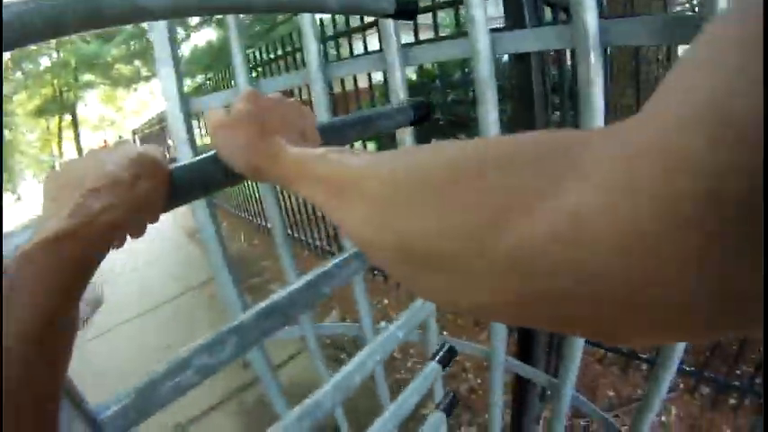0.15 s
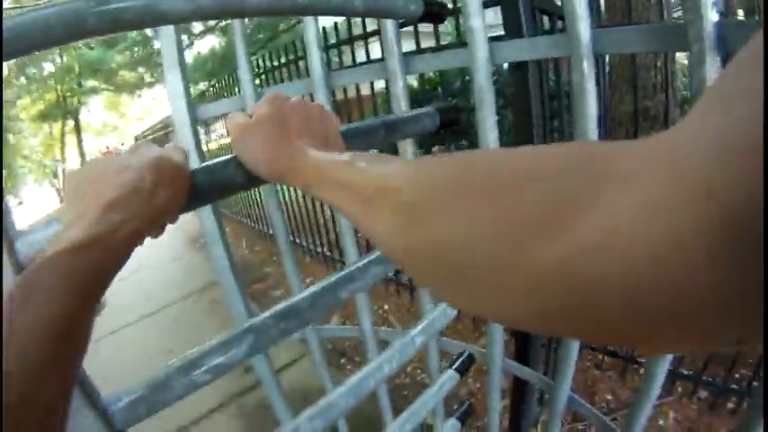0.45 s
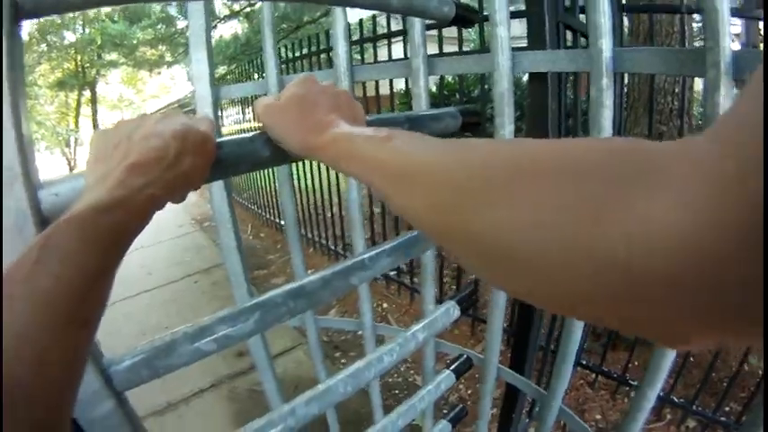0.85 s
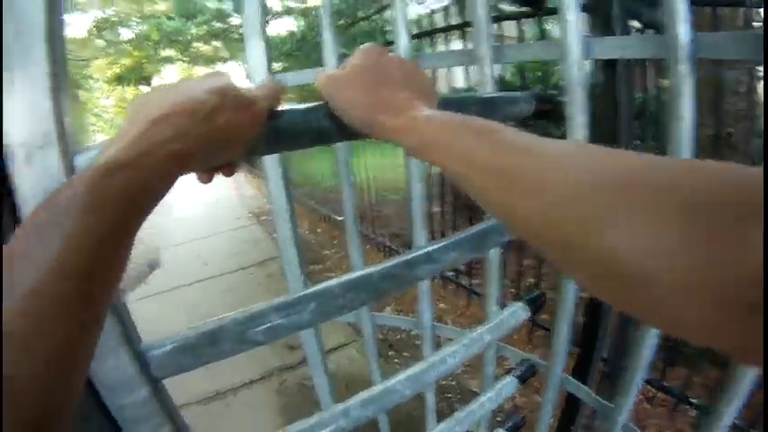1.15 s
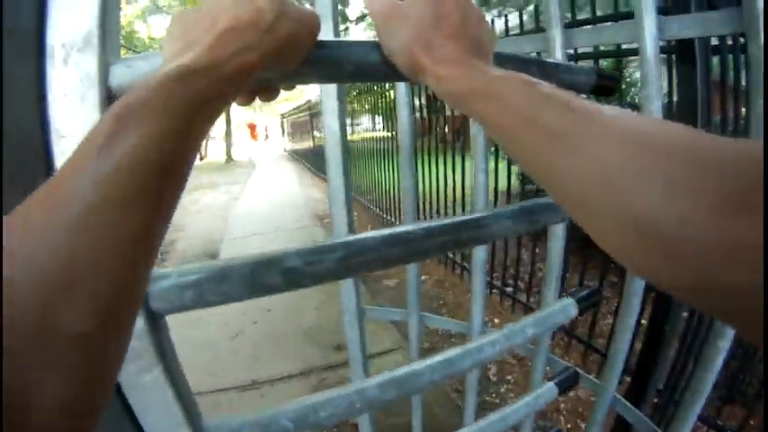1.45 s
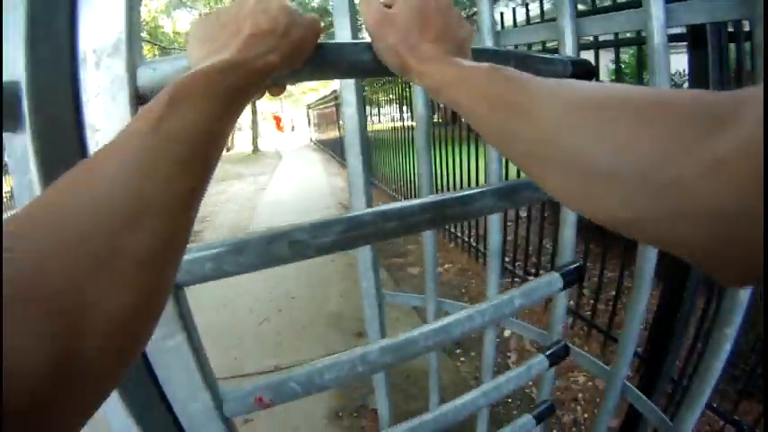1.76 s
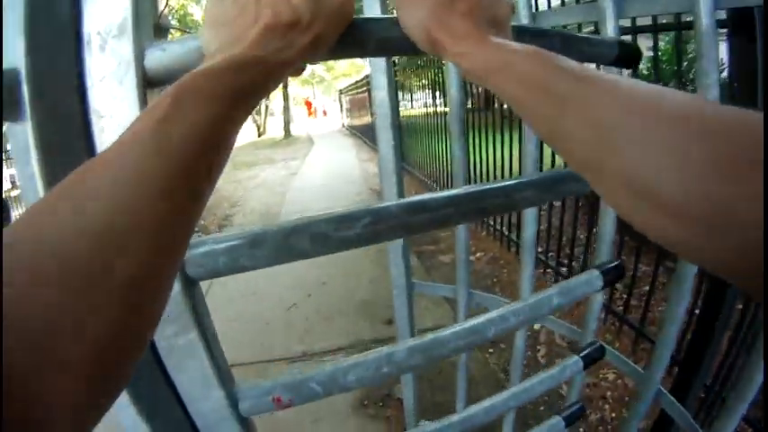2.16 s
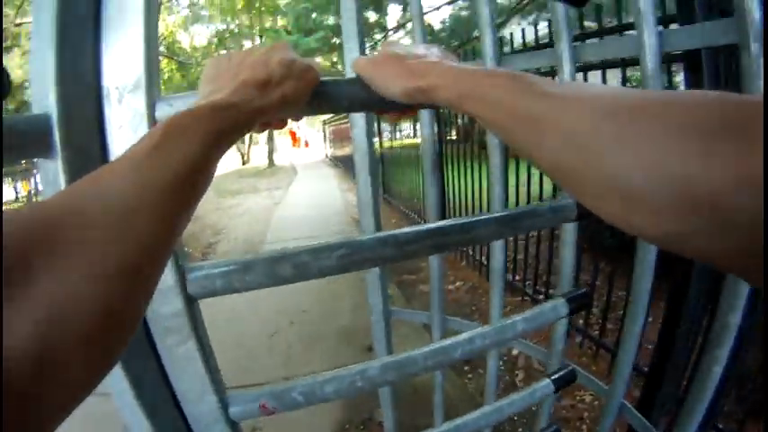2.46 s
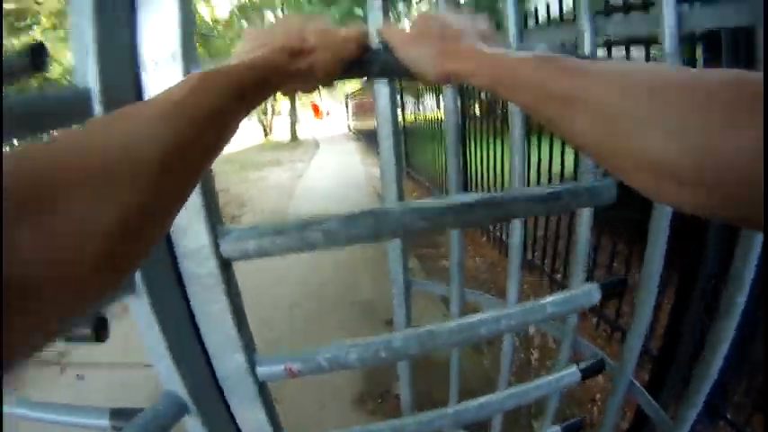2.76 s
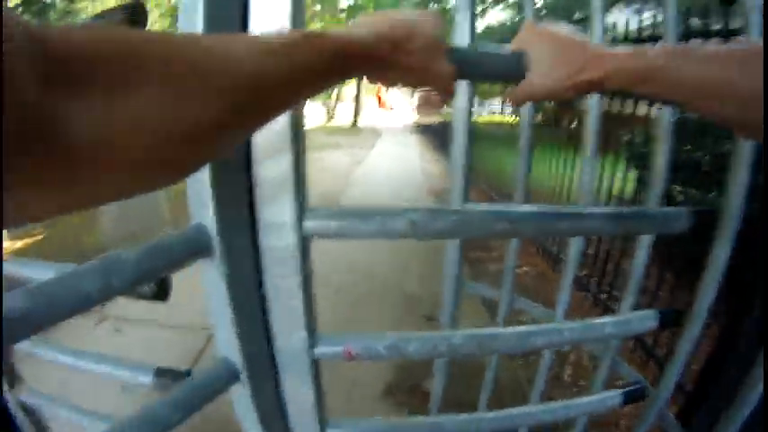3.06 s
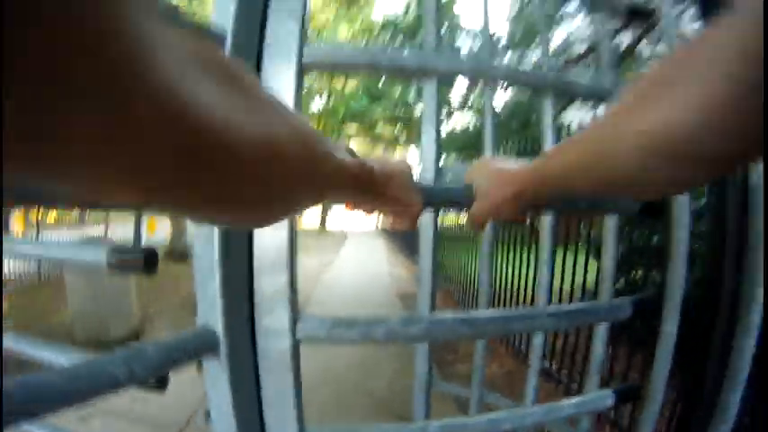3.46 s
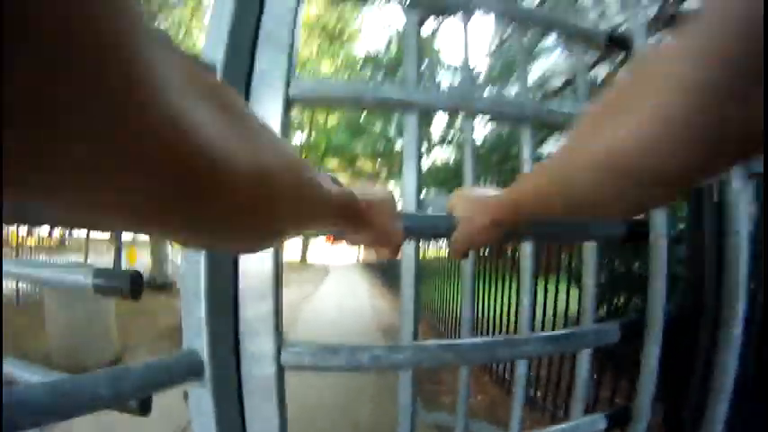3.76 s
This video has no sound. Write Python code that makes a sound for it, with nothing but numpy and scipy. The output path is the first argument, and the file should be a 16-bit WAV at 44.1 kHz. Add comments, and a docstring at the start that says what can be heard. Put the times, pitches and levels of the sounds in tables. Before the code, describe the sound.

Steel turnstile gate scrapes and catches over soft quick low thumps, ending in two hard clacks.

```python
"""A steel turnstile is pushed round by hand: it rubs, catches in short scrapes and gives two sharp snaps near the end.
Friction is a dense train of stick-slip ticks that excites resonances; snaps and a light knock ring decaying modes.
Each loud snap comes with one dull bump and is followed by another, as the body-worn camera rocks on its mount.
Low thumps run under it at an even, fast pace, most likely the wearer's pulse carried through the mount.
Rumble from the moving body and muffled outdoor air lie behind; the camera in its closed case samples at 12 kHz."""
import sys
import numpy as np
from scipy import signal
from scipy.fft import rfft, irfft
from scipy.io import wavfile
from scipy.ndimage import uniform_filter1d

SR = 44100
rng = np.random.default_rng(int(sys.argv[2]) if len(sys.argv) > 2 else 0)


def inscribe(sig):
    """Save sig as 16-bit PCM at rate SR to the path in sys.argv[1].

    A 1-D sig is mono; a 2-D sig holds one channel per row.
    Samples are clipped to [-1, 1] before scaling.
    """
    pcm = np.round(np.clip(np.atleast_2d(sig).T, -1, 1) * 32767)
    wavfile.write(sys.argv[1], SR, pcm.astype(np.int16))


N = 171990  # length [samples]


def undb(db):
    """Level definition: an amplitude ratio is 10 to the power of dB / 20."""
    return 10 ** (np.asarray(db) / 20)


def unit(x):
    """Normalization: scale a signal to an rms of 1."""
    return x / np.sqrt(np.mean(x ** 2) + 1e-20)


def fall(t, t60):
    """Exponential decay: after time zero the amplitude falls by 60 dB in t60 seconds."""
    return np.exp(-np.log(1000) * np.maximum(t, 0) / t60)


def mode(t, hz, t60):
    """Damped oscillation: a cosine that dies away exponentially."""
    return np.cos(2 * np.pi * hz * t) * fall(t, t60)


def add(out, start, x):
    """Superposition: mix a sound into out from a start time in seconds."""
    i = int(start * SR)
    out[i:i + len(x)] += x[:len(out) - i]


def colour(x, points):
    """Linear filtering: weight the spectrum by (frequency [Hz], level [dB]) points on a log-frequency axis."""
    hz, db = np.array(points).T
    f = np.maximum(np.fft.rfftfreq(len(x), 1 / SR), 1)
    gain = undb(np.interp(np.log(f), np.log(hz), db))
    return irfft(rfft(x) * gain, len(x))


def resonate(x, hz, width_hz):
    """Resonance: a second-order band-pass with gain 1 at its centre."""
    return signal.lfilter(*signal.iirpeak(hz, hz / width_hz, fs=SR), x)


def ring_resonances(x, resonances):
    """Parallel resonance: sum bands given as (frequency [Hz], width [Hz], gain [dB])."""
    return sum(undb(db) * resonate(x, hz, width_hz) for hz, width_hz, db in resonances)


def curve(rows):
    """Amplitude modulation: gain over time through (time [s], level [dB]) points."""
    return undb(np.interp(np.arange(N) / SR, *np.array(rows).T))


def walk(rate):
    """Random modulation: smoothed random steps, rate per second, with an rms of 1."""
    step = int(SR / rate)
    steps = np.repeat(rng.standard_normal(N // step + 1), step)
    return unit(uniform_filter1d(steps, step)[:N])


# Level of the handling rumble before its flicker: (time [s], level [dB])
RUMBLE_LEVEL = [(0, -44), (.15, -45.5), (.7, -50.5), (1.1, -49.5), (1.33, -50.5), (1.45, -39), (1.6, -53.5),
                (2.05, -55), (2.18, -37.5), (2.35, -59), (2.5, -34.5), (2.7, -48.5), (2.9, -43.5),
                (3.1, -37.5), (3.2, -49.5), (3.38, -35), (3.6, -37), (3.7, -44), (3.9, -32)]
# Spectrum of the rumble: (frequency [Hz], relative density [dB per Hz])
RUMBLE_SPECTRUM = [(12, -13.5), (27, 5.5), (45, -5), (70, -13), (120, -21.5), (200, -27.5), (400, -44),
                   (900, -75)]
RUMBLE_FLICKER_DB = 2


def rumble():
    """Filtered noise: the moving body gives a broadband rumble of uneven level."""
    noise = unit(colour(rng.standard_normal(N), RUMBLE_SPECTRUM))
    return noise * curve(RUMBLE_LEVEL) * undb(RUMBLE_FLICKER_DB * walk(rate=14))


# Spectrum of the muffled outdoor background: (frequency [Hz], relative level [dB])
AIR_SPECTRUM = [(60, -6), (120, -1), (220, -8.5), (300, -11), (640, -15.5), (1140, -19), (1760, -22.5),
                (2100, -24), (2900, -25), (5600, -29)]
AIR_DB = -58


def outdoor_air():
    """Stationary noise: random pressure with a steady spectrum that falls towards the treble."""
    return undb(AIR_DB) * unit(colour(rng.standard_normal(N), AIR_SPECTRUM))


def swell(t, hz, width_s):
    """Gaussian wave packet: an inverted cosine under a bell centred on time zero."""
    return -np.cos(2 * np.pi * hz * t) * np.exp(-.5 * (t / width_s) ** 2)


# Pulse thumps: (time of centre [s], level [dB], pitch [Hz], level of the slow sway [dB])
PULSE_THUMPS = [(0.226, -26, 89, -30.5), (.541, -26, 99, -28), (0.8559, -24, 92, -29.5),
                (1.1725, -29.5, 89, -33), (1.486, -29.5, 97, -33.5), (1.801, -25.5, 92, -27.5),
                (2.1142, -23, 89, -28), (2.429, -24, 95, -30), (2.751, -29, 91, -35.5),
                (3.071, -31, 106, -46), (3.384, -29.5, 106, -34), (3.699, -31, 104, -50)]
THUMP_WIDTH_S = 0.006
EDGE_HZ, EDGE_WIDTH_S, EDGE_DB = 173, 0.0028, -16.5  # firm peak, level relative to the beat
SWAY_HZ, SWAY_LAG_S, SWAY_WIDTH_S = 51.2, 0.0014, 0.019


def thumps():
    """Forced motion of a mount: each soft beat is firmest at its peak, with a slower sway around it."""
    out, t = np.zeros(N), np.arange(N) / SR
    for centre, db, hz, sway_db in PULSE_THUMPS:
        u = t - centre
        beat = swell(u, hz, THUMP_WIDTH_S) + undb(EDGE_DB) * swell(u, EDGE_HZ, EDGE_WIDTH_S)
        sway = swell(u - SWAY_LAG_S, SWAY_HZ, SWAY_WIDTH_S)
        out += undb(db) * beat + undb(sway_db) * sway
    return out


# Bumps of the camera mount: (start [s], level before rise and decay [dB], pitch [Hz])
MOUNT_BUMPS = [(3.438, -22.5, 38), (3.5035, -14.5, 29.2), (3.7195, -20, 34.3), (3.7959, -13, 32)]
BUMP_RISE_S, BUMP_T60_S, BUMP_LEAD_S = 0.0016, 0.12, 0.0028  # the lead advances the phase


def bumps():
    """Impulse response of a damped mass on a spring: a jolt sets the camera rocking on its mount."""
    out, t = np.zeros(N), np.arange(SR // 3) / SR
    rise = 1 - np.exp(-(t / BUMP_RISE_S) ** 2)
    for start, db, hz in MOUNT_BUMPS:
        rocking = -np.sin(2 * np.pi * hz * (t + BUMP_LEAD_S)) * fall(t, BUMP_T60_S)
        add(out, start, undb(db) * rise * rocking)
    return out


# Modes of the hand-damped bars: (frequency [Hz], relative level [dB], t60 [s])
BAR_RINGING = [(1130, -16, 0.18), (1555, -11.5, 0.22), (1800, -7, 0.087), (1990, 4.5, 0.06),
               (2250, -11, .15), (4810, -11.5, 0.11), (5180, -9, 0.05)]
KNOCK_S, KNOCK_DB = 2.709, -41.5


def knock():
    """Modal vibration: a light knock makes the hand-damped bars ring briefly as the gate moves on."""
    out, t = np.zeros(N), np.arange(SR // 2) / SR
    ring = sum(undb(db) * np.sin(2 * np.pi * hz * t) * fall(t, t60) for hz, db, t60 in BAR_RINGING)
    add(out, KNOCK_S, undb(KNOCK_DB) * ring)
    return out


SLIPS_PER_S, SLIP_SCATTER_DB = 3000, 0.5  # mean rate and spread of strength


def slips(size):
    """Stick-slip friction: dense ticks at random times, of either sign and uneven strength."""
    happens = rng.random(size) < SLIPS_PER_S / SR
    sign = rng.choice([-1, 1], size)
    return happens * sign * undb(SLIP_SCATTER_DB * rng.standard_normal(size))


SCRAPE_ATTACK_S = 0.00067


def burst(t, hold, t60):
    """Transient envelope: quick linear attack, hold, then exponential decay."""
    return np.minimum(t / SCRAPE_ATTACK_S, 1) * fall(t - hold, t60)


# Hollow drags: (start [s], rms level before the envelope [dB], hold [s], t60 [s])
HOLLOW_DRAGS = [(0.52, -55.5, 0.039, 0.62), (0.649, -53.5, 0.0098, 0.29)]
# Narrow resonances of the drags: (frequency [Hz], width [Hz], gain [dB])
HOLLOW_RESONANCES = [(760, 190, -7.5), (1170, 68, 1), (1520, 46, 3.5), (1620, 47, -2), (2080, 40, -2)]


def drags():
    """Friction-driven resonance: longer runs of slips sound hollow through a few narrow bands."""
    out, t = np.zeros(N), np.arange(SR // 2) / SR
    for start, db, hold, t60 in HOLLOW_DRAGS:
        rung = ring_resonances(slips(len(t)), HOLLOW_RESONANCES)
        add(out, start, undb(db) * unit(rung) * burst(t, hold, t60))
    return out


# Level of the rubbing before its flicker: (time [s], level [dB])
RUB_LEVEL = [(0, -58), (.12, -65.5), (.45, -68.5), (.76, -69), (.88, -59), (1.05, -63), (1.2, -69.5),
             (1.42, -60.5), (1.51, -53.5), (1.6, -53.5), (1.7, -61.5), (1.95, -71), (2.3, -70.5),
             (2.42, -65), (2.5, -55), (2.75, -56.5), (2.82, -63), (2.89, -55), (3.15, -62.5), (3.3, -58),
             (3.48, -57), (3.56, -56.5), (3.83, -59.5), (3.88, -53.5)]
# Spectrum of the friction grain: (frequency [Hz], relative density [dB per Hz])
RUB_SPECTRUM = [(400, -30), (900, -23), (1150, -7), (1330, -22.5), (1560, -2), (1750, -9), (2050, -3),
                (2330, -3), (2520, -19.5), (2700, -7.5), (2950, -19), (3250, -6), (3800, -18), (5600, -17)]
RUB_HZ, RUB_SHIFT_HZ, RUB_WIDTH_HZ = 2342, -150, 81  # one resonance, offset of the other, width
RUB_RING_DB, RUB_WANDER_DB, RUB_FLICKER_DB = -3, 7, 0.5  # ringing relative to the grain; spreads


def rubbing():
    """Sustained friction: faint grain rings two close resonances that come and go independently."""
    ticks = slips(N)
    ring = np.zeros(N)
    for hz in (RUB_HZ, RUB_HZ + RUB_SHIFT_HZ):
        ring += resonate(ticks, hz, RUB_WIDTH_HZ) * undb(RUB_WANDER_DB * walk(rate=12))
    rub = unit(colour(ticks, RUB_SPECTRUM)) + undb(RUB_RING_DB) * unit(ring)
    return unit(rub) * curve(RUB_LEVEL) * undb(RUB_FLICKER_DB * walk(rate=88))


# Scrapes: (start [s], rms level before the envelope [dB], hold [s], t60 [s], centre of brightness [Hz])
GATE_SCRAPES = [(0.04, -51.5, 0.02, 0.082, 2160), (0.177, -54, 0.0089, 0.044, 2300),
                (0.192, -49, 0.0056, 0.067, 2450), (0.211, -59, 0.0087, 0.055, 2460),
                (0.256, -51.5, 0.0076, .025, 2340), (.332, -50.5, 0.0066, .035, 2580),
                (0.443, -53.5, 0.0032, 0.065, 2160), (0.516, -47.5, 0.0098, 0.057, 1700),
                (1.079, -57, 0.06, 0.07, 3050), (1.262, -56.5, 0.002, 0.023, 3140),
                (1.332, -54.5, .005, 0.095, 1660), (1.7412, -41, 0.0081, 0.13, 2600),
                (2.329, -47, .006, 0.11, 2430), (2.649, -47, 0.03, 0.11, 2970),
                (2.708, -45.5, 0.0035, 0.12, 1890), (2.851, -53, 0.0038, 0.13, 2980),
                (2.931, -49.5, .005, 0.2, 1640), (3.016, -56, .006, .03, 3000),
                (3.0900, -41, 0.0066, 0.061, 3060), (3.103, -52.5, 0.014, 0.17, 2430),
                (3.220, -56, 0.0043, .04, 2800), (3.27, -50, 0.02, 0.088, 1680),
                (3.332, -47, 0.0064, 0.082, 2480), (3.387, -51.5, 0.0056, 0.061, 2780),
                (3.429, -46, 0.0027, 0.11, 2410), (3.493, -46, .002, 0.036, 1800),
                (3.758, -49.5, 0.0034, 0.09, 3180), (3.7702, -42.5, .002, 0.017, 3400)]
# Resonances of the gate: (frequency [Hz], width [Hz], gain [dB])
GATE_RESONANCES = [(417, 160, -3), (850, 140, 1), (1170, 135, 9.5), (1513, 88, 6), (2070, 276, 8.5),
                   (2196, 110, -7), (2725, 240, -4.5), (3310, 160, 0), (3470, 150, -22), (4750, 260, -13)]
GATE_BODY_DB = -36.5  # ticks heard directly, without resonance
SCRAPE_OCTAVES, SCRAPE_SKIRT_DB = 0.61, -18.5  # half-width of the bright band; gain far from it


def scrapes():
    """Stick-slip excitation: as the gate catches, slips ring its resonances, hold and die away."""
    out, t = np.zeros(N), np.arange(SR // 3) / SR
    f = np.maximum(np.fft.rfftfreq(len(t), 1 / SR), 1)
    for start, db, hold, t60, bright_hz in GATE_SCRAPES:
        ticks = slips(len(t))
        rung = undb(GATE_BODY_DB) * ticks + ring_resonances(ticks, GATE_RESONANCES)
        octaves_away = np.log2(f / bright_hz)
        brightness = undb(SCRAPE_SKIRT_DB) + 1 / (1 + (octaves_away / SCRAPE_OCTAVES) ** 2)
        rung = irfft(rfft(rung) * brightness, len(t))
        add(out, start, undb(db) * unit(rung) * burst(t, hold, t60))
    return out


# Snaps: (start [s], peak level [dB], contact pitch [Hz], contact t60 [s], low cutoff [Hz])
GATE_SNAPS = [(1.5912, -40, 2370, 0.014, 1200), (3.124, -29, 3800, 0.00043, 450),
              (3.4377, -6.5, 2060, 0.002, 150), (3.7182, -6.5, 1113, 0.0052, 620)]
# Modes of the snapping part: (frequency [Hz], relative level [dB], t60 [s])
SNAP_RINGING = [(845, -5, 0.021), (960, -9, 0.018), (1110, -7, 0.023), (1586, -9, 0.029),
                (2040, 5.5, 0.013), (2360, 7.5, 0.0064), (3300, 5, 0.014), (3700, 5, 0.015),
                (5250, -8, 0.021)]
SNAP_RING_DB = 13.5  # relative to the contact
SNAP_PUSH_DB, SNAP_PUSH_T60_S = -14.5, 0.0019  # dull push, relative to contact and ring together


def snaps():
    """Impact excitation: a hard, brief contact with a dull push under it rings a few short modes."""
    out, t = np.zeros(N), np.arange(SR // 12) / SR
    modes = sum(undb(db) * mode(t, hz, t60) for hz, db, t60 in SNAP_RINGING)
    for start, db, hz, t60, low_hz in GATE_SNAPS:
        contact = -mode(t, hz, t60)
        ring = signal.fftconvolve(contact, modes)[:len(t)]
        snap = unit(contact) + undb(SNAP_RING_DB) * unit(ring)
        push = unit(fall(t, SNAP_PUSH_T60_S))
        snap = unit(snap) - undb(SNAP_PUSH_DB) * push
        snap = signal.lfilter(*signal.butter(3, low_hz, "high", fs=SR), snap)
        add(out, start, undb(db) * snap / np.abs(snap).max())
    return out


def scene():
    """Superposition: all sources add at the one microphone."""
    background = rumble() + outdoor_air()
    camera_mount = thumps() + bumps()
    gate = knock() + drags() + rubbing() + scrapes() + snaps()
    return (background + camera_mount + gate)[None]


SAMPLER_EDGE_HZ, TOP_HZ = 5550, 15250  # low-pass edges before and after the sampler


def record(dry):
    """Sample and hold: sampling at 12 kHz and holding each value mirrors the sound into the treble."""
    band = signal.sosfilt(signal.butter(20, SAMPLER_EDGE_HZ, fs=SR, output="sos"), dry)
    at_48k = signal.resample_poly(band, 160, 147, axis=1)
    held = np.repeat(at_48k[:, ::4], 4, axis=1)
    out = signal.resample_poly(held, 147, 160, axis=1)[:, :N]
    return signal.sosfilt(signal.ellip(8, .2, 70, TOP_HZ, fs=SR, output="sos"), out)


dry = scene()
out = record(dry)
inscribe(out)
```